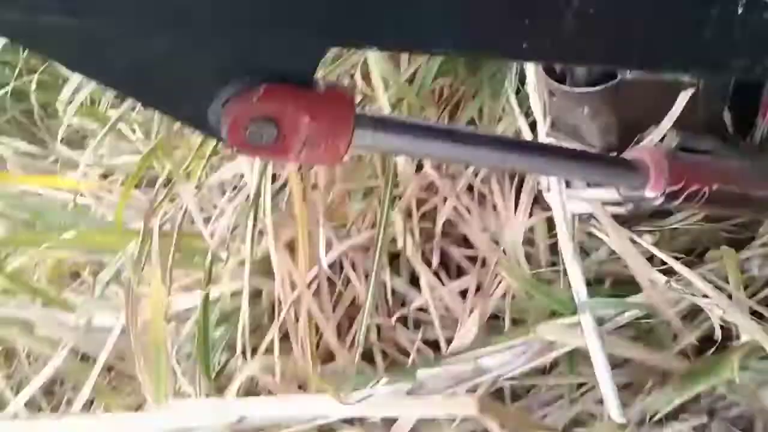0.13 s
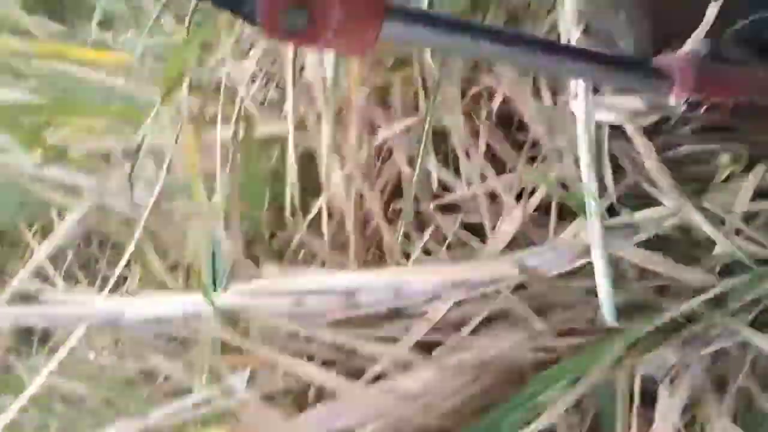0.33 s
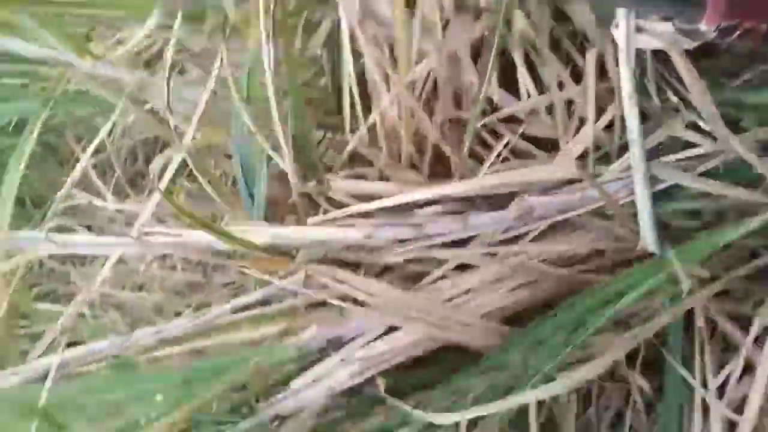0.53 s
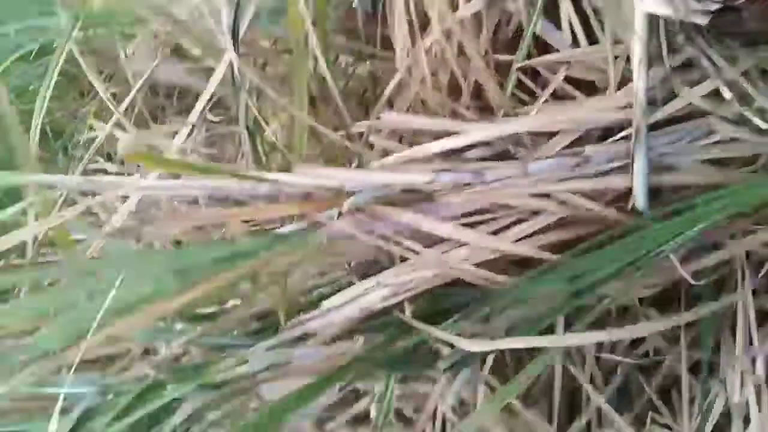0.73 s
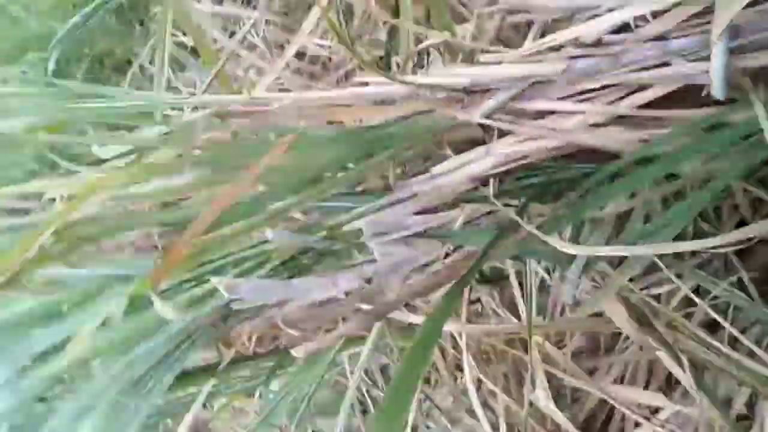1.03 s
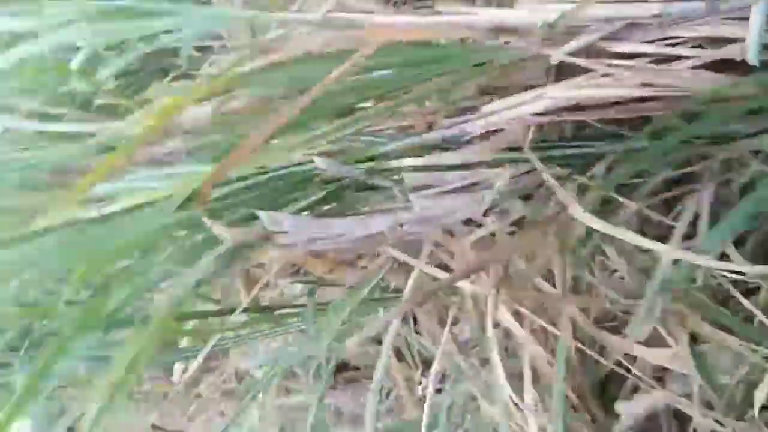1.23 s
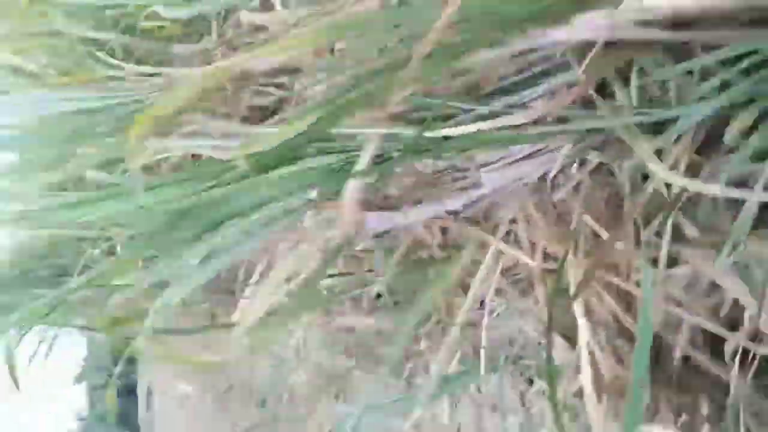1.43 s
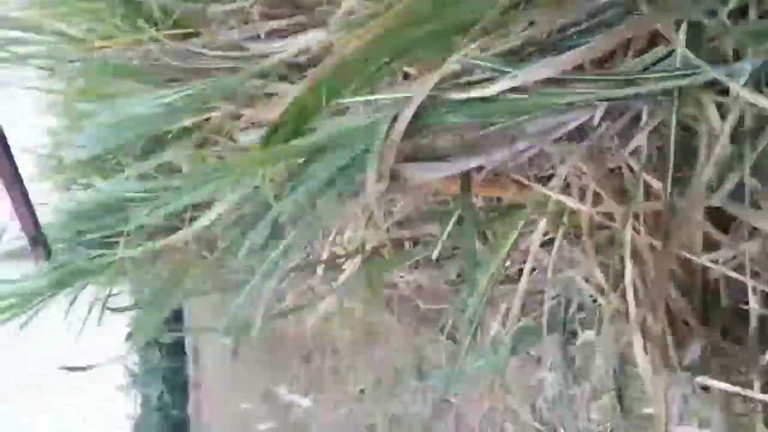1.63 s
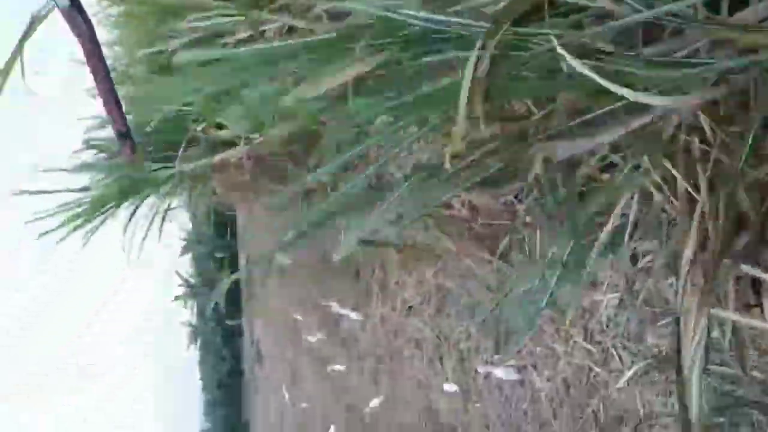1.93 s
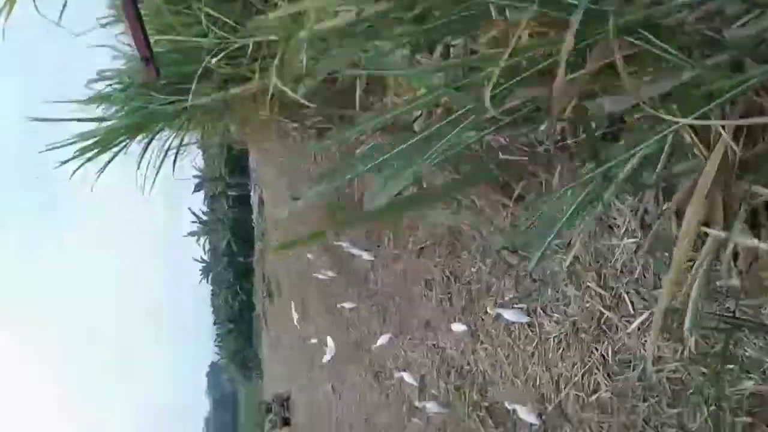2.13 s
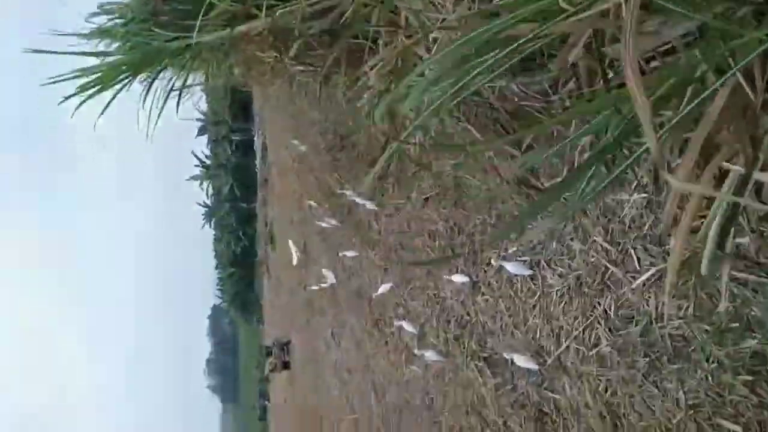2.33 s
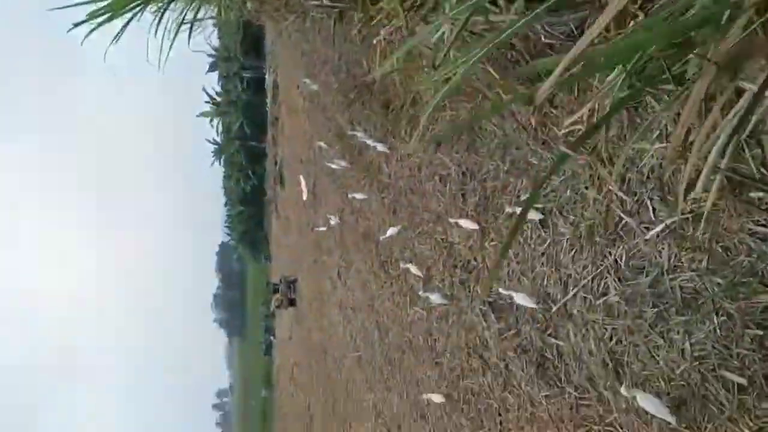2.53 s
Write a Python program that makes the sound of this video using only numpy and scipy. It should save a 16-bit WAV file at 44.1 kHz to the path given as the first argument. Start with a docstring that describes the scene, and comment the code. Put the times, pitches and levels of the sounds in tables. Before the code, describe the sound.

A sugarcane harvester works close by in a field, crushing stalks with crackles, hollow knocks and hissing leaves. Steel rattles over a wavering hydraulic drone and engine rumble. The crunching fades as the phone microphone turns away.

```python
"""Stalks crackle and steel rattles over a hydraulic drone: a cane harvester at work, close by.
Cane is crushed on its way through, stalks knock hollowly in the chute and leaves hiss, while small
impacts and hard blows sound the steel. A pump gives the drone; the engine rumbles low underneath.
The microphone is a phone's, and the crushing fades as it turns away towards the open field."""
import sys
import numpy as np
from scipy import signal
from scipy.fft import rfft, irfft
from scipy.io import wavfile
from scipy.ndimage import uniform_filter1d

SR = 44100
rng = np.random.default_rng(int(sys.argv[2]) if len(sys.argv) > 2 else 0)


def wav_record(signal):
    """Record a signal, one row per channel, as 16-bit PCM in the file named by sys.argv[1]."""
    frames = np.transpose(np.atleast_2d(signal))
    bounded = np.clip(frames, -1, 1)
    # unit amplitude maps onto the largest positive 16-bit level
    quanta = np.round(bounded * 32767).astype(np.int16)
    wavfile.write(sys.argv[1], SR, quanta)


N = 117747
T = np.arange(N) / SR

# cane passing through, relative levels: t/s, crushing/dB, frame/dB, high ring/dB, leaf hiss/dB
CANE_FEED = [(0.0, -20.5, -24, -29, -27), (0.01, -18.5, -30, -33, -28.5), (0.07, -20.5, -23, -37, -31),
             (0.1, -19, -29, -27, -34), (0.3, -22, -27.5, -45, -31.5), (0.39, -25.5, -32, -33, -33),
             (0.42, -19, -24.5, -26, -31), (0.52, -31.5, -34, -27.5, -33.5), (0.58, -28, -28, -26, -32),
             (0.59, -21, -34, -22, -29), (0.61, -21.5, -30, -34, -32.5), (0.68, -24, -28.5, -22, -32),
             (1.04, -25, -28.5, -37, -33.5), (1.11, -20.5, -41, -31, -32), (1.12, -27, -32.5, -26.5, -34),
             (1.34, -21.5, -27.5, -24, -31), (1.39, -25.5, -24, -36, -36), (1.4, -30.5, -39, -32, -34.5),
             (1.46, -26.5, -34, -28, -34.5), (1.52, -34.5, -41, -27, -37), (1.55, -27, -31, -23, -32.5),
             (1.64, -30, -36, -27.5, -36), (1.66, -35, -37, -36, -32), (1.67, -30, -25, -17.5, -38),
             (1.76, -34.5, -32.5, -24, -37), (1.89, -33, -36.5, -30, -37), (1.92, -50, -33, -31, -38),
             (2.01, -31, -37, -26, -33.5), (2.07, -40, -45, -35, -37), (2.1, -36, -30.5, -26, -34.5),
             (2.15, -33.5, -48, -32.5, -40), (2.18, -37, -33, -24, -39), (2.19, -43, -37, -34, -38.5),
             (2.36, -32.5, -40, -26, -36.5), (2.38, -38, -57, -36, -35), (2.48, -53, -34, -36, -39.5),
             (2.49, -35, -37, -23, -39), (2.52, -47, -43.5, -33.5, -38.5), (2.64, -40, -33, -27.5, -37.5),
             (2.67, -51, -40, -47, -40)]
# ring of the thin sheet parts, and the whistle: t/s, sheet level/dB, whistle level/dB
SHEET_AND_WHISTLE = [(0, -27, -47), (.5, -33, -56), (.9, -32.5, -56), (1.4, -35.5, -52), (1.55, -38.5, -43),
                     (1.75, -30.5, -50), (1.93, -49, -50), (2.05, -35.5, -48), (2.2, -37.5, -43),
                     (2.35, -34, -47), (2.5, -39.5, -48), (2.67, -34, -52)]


def gain_of(db):
    return 10 ** (np.asarray(db) / 20)


def unit_rms(x):
    return x / np.sqrt(np.mean(x ** 2) + 1e-20)


def curve(table, column):
    """One column of a timed table, joined by straight lines."""
    rows = np.array(table)
    return np.interp(T, rows[:, 0], rows[:, column])


def coloured(x, spectrum):
    """x shaped by a spectrum (f/Hz, level/dB), at rms 1."""
    f, db = np.transpose(spectrum)
    hz = np.fft.rfftfreq(len(x), 1 / SR)
    shape_db = np.interp(np.log(hz + 1), np.log(f + 1), db, left=-90)
    return unit_rms(irfft(rfft(x) * gain_of(shape_db), len(x)))


def wander(top_hz):
    """Random drift of rms 1, mostly slower than top_hz."""
    spectrum = rfft(rng.standard_normal(N)) / (1 + (np.fft.rfftfreq(N, 1 / SR) / top_hz) ** 2)
    spectrum[0] = 0
    return unit_rms(irfft(spectrum, N))


def resonate(x, hz, width):
    """x passed twice through one resonance, at rms 1."""
    carrier = np.exp(2j * np.pi * hz * np.arange(len(x)) / SR)
    pole = np.exp(-np.pi * width / SR)
    baseband = x / carrier
    for _ in range(2):
        baseband = signal.lfilter([1 - pole], [1, -pole], baseband)
    return unit_rms((carrier * baseband).real)


def resonant_noise(modes):
    """Noise in a set of resonances (f/Hz, width/Hz, level/dB), at rms 1."""
    bands = (gain_of(db) * resonate(rng.standard_normal(N), hz, width) for hz, width, db in modes)
    return unit_rms(sum(bands))


def strikes(events, rise_s):
    """An envelope with a quick rise and exponential fall for each (t/s, level/dB, t60/s)."""
    out = np.zeros(N)
    for start, db, t60 in events:
        age = np.maximum(T - start, 0)
        out += np.minimum(age / rise_s, 1) * gain_of(db - 60 * age / t60)
    return out


def rattle(modes, patchy_db, hits_per_s=2500, spread_db=3.0):
    """Dense small impacts ring each steel part, which comes and goes by itself."""
    out = np.zeros(N)
    for hz, width, db in modes:
        hits = (rng.random(N) < hits_per_s / SR) * rng.choice([-1., 1.], N)
        force_db = spread_db * np.minimum(rng.exponential(1, N), 5) + patchy_db * wander(10)
        out += gain_of(db) * resonate(hits * gain_of(force_db), hz, width)
    return unit_rms(out)


def crushing_cane(crackle_db=1.5, patch_db=5.0):
    """Close crackling noise whose colour shifts in patches as stalks break."""
    # spectrum of crushed stalks: f/Hz, level/dB
    spectrum = [(1400, -23), (1730, -13.5), (2360, -23), (3070, -5.5), (3550, -9), (3850, -4.5),
                (4120, -10.5), (4450, -1.5), (5100, -7.5), (5450, -11.5), (5700, -4), (5920, -11),
                (6300, -2), (6700, -5), (6900, -7), (7400, -4), (9000, -10), (11000, -56)]
    crackle = rng.standard_normal(N) * gain_of(crackle_db * wander(170))
    frames = signal.stft(coloured(crackle, spectrum), nperseg=512, noverlap=384)[2]
    patches = rng.standard_normal(frames.shape)
    for size, axis in [(2, 0), (30, 1), (10, 1)]:  # smooth across frequency, then twice along time
        patches = uniform_filter1d(patches, size, axis)
    frames *= gain_of(patch_db * unit_rms(patches))
    crunch = signal.istft(frames, nperseg=512, noverlap=384)[1][:N]
    return gain_of(curve(CANE_FEED, column=1) - 1) * unit_rms(crunch)


def rattling_steel():
    """The frame and thin sheet parts rattle, with a high ring above them."""
    # resonances of the frame, the sheet parts and the high ring: f/Hz, width/Hz, level/dB
    frame_modes = [(2567, 54, -2), (2940, 110, 5), (3116, 153, 6.5)]
    sheet_modes = [(3474, 130, -7), (3820, 51, -5), (4140, 37, 0.5), (4470, 59, 2.5), (4975, 86, -0.5),
                   (5770, 48, 3.5), (6020, 31, -10), (6420, 120, 3.5), (6840, 110, -1)]
    high_modes = [(7280, 110, -8), (7570, 200, 0), (7830, 130, -3), (8330, 120, -8), (9230, 130, -5)]
    frame = gain_of(curve(CANE_FEED, column=2) - 1.5) * rattle(frame_modes, patchy_db=3.5)
    sheet = gain_of(curve(SHEET_AND_WHISTLE, column=1)) * rattle(sheet_modes, patchy_db=5.0)
    high_ring = gain_of(curve(CANE_FEED, column=3) - 5) * rattle(high_modes, patchy_db=1.5)
    return frame + sheet + high_ring


def hydraulic_drone(waver_hz=1.72, waver_db=2):
    """The pump's tone wavers in pitch and level inside a band of roar."""
    # course of the pump, relative levels: t/s, f/Hz, tone/dB, roar/dB
    pump = [(0.0, 353, -30.5, -31.5), (0.07, 351, -28, -33), (0.37, 344.6, -21, -32),
            (0.46, 341.9, -31.5, -37), (0.47, 345, -21, -33), (0.98, 341.5, -27, -30),
            (1.02, 340.2, -29, -40), (1.07, 349.6, -23.5, -31), (1.11, 342.3, -44, -42),
            (1.13, 342.3, -22.5, -30), (1.22, 342.6, -55, -51.5), (1.28, 340.2, -26, -30.5),
            (1.37, 340, -41, -53), (1.39, 348.2, -27, -29), (1.54, 343.7, -21.5, -31),
            (1.62, 354.5, -43, -33), (1.66, 351.2, -26, -32.5), (1.79, 343.9, -37.5, -34.5),
            (1.87, 350, -22, -29.5), (2.09, 345.5, -27.5, -39), (2.24, 334.9, -29, -32),
            (2.36, 337, -42, -56), (2.45, 347.0, -36, -49), (2.54, 337.2, -23, -30),
            (2.59, 338.4, -34, -46), (2.67, 347, -24, -33)]
    # resonances around the tone: f/Hz, width/Hz, level/dB
    roar_modes = [(377.4, 74, 1.5), (438.6, 29, -11.5), (321.4, 21.6, -1.5)]
    hz = curve(pump, column=1) + waver_hz * wander(13.3)
    tone = np.sqrt(2) * np.sin(2 * np.pi * np.cumsum(hz) / SR)
    tone *= gain_of(curve(pump, column=2) + waver_db * wander(25.4))
    roar = gain_of(curve(pump, column=3) + 3) * resonant_noise(roar_modes)
    return tone + roar


def stalk_knocks(rise_s=0.0045, roughness=0.48):
    """Each stalk knocks in the chute and rings at its own pitch, roughened by scraping."""
    # stalks striking the chute: t/s, level/dB, f/Hz, t60/s
    knocks = [(.003, -24, 1333, 0.079), (0.031, -19, 1743, 0.19), (0.056, -27, 1740, .15),
              (.1, -25, 1770, 0.095), (.205, -29, 2170, .15), (0.263, -22, 1717, 0.29),
              (0.265, -27, 1980, .17), (.37, -21, 629, 0.19), (.44, -34, 1680, .15),
              (0.589, -14.5, 1904, 0.081), (.65, -29, 1620, .15), (0.699, -30.5, 1940, 0.22),
              (0.736, -26, 1327, 0.33), (.778, -28, 1263, 0.22), (.778, -27.5, 1770, 0.2),
              (.858, -20.5, 641, 0.36), (.88, -28, 1640, 0.14), (.957, -19.5, 685, 0.16),
              (0.982, -30, 660, .13), (1.008, -18.5, 1640, 0.097), (1.012, -25, 2170, .15),
              (1.064, -10.5, 645, 0.15), (1.09, -15.5, 608, 0.12), (1.19, -30, 1944, 0.28),
              (1.237, -22, 661, 0.13), (1.309, -19, 1592, 0.21), (1.32, -27, 1965, 0.17),
              (1.407, -24, 1240, 0.076), (1.568, -28.5, 1223, 0.23), (1.797, -29, 1660, 0.22),
              (1.806, -29.5, 1190, 0.16), (1.907, -18, 990, 0.22), (1.905, -33, 1180, 0.26),
              (1.909, -27, 805, .1), (1.91, -23.5, 1648, 0.18), (1.946, -15, 957, 0.11),
              (1.988, -30.5, 1740, 0.41), (2.0, -18, 1300, 0.13), (2.02, -28, 1012, 0.15),
              (2.06, -33.5, 1108, 0.34), (2.109, -33, 1480, 0.2), (2.139, -24.5, 1084, 0.22),
              (2.276, -27, 1544, 0.22), (2.291, -23, 847, 0.15), (2.298, -17, 1037, 0.11),
              (2.345, -16, 882, 0.089), (2.403, -21, 1012, 0.2), (2.519, -36, 1797, 0.25),
              (2.65, -25, 997, 0.15)]
    length = 8000
    t = np.arange(length) / SR
    out = np.zeros(N + length)
    for start, db, hz, t60 in knocks:
        scrape = resonate(rng.standard_normal(length), hz, width=113)
        ring = (1 - roughness) * np.sin(2 * np.pi * hz * t) + roughness * scrape
        at = round(start * SR)
        out[at:at + length] += ring * (1 - np.exp(-t / rise_s)) * gain_of(db - 60 * t / t60)
    return out[:N]


def steel_blows(split_hz=3540):
    """Hard blows on the steel: each a crack, duller or brighter, that dies away."""
    # blows: t/s, level below the split/dB, level above it/dB, t60/s
    blows = [(.056, -19, -31, 0.14), (0.59, -18, -40, 0.088), (1.376, -35, -48, 0.088),
             (1.6728, -37, -15.5, 0.12), (1.705, -44, -23.5, 0.12), (1.907, -36, -33, 0.067),
             (2.103, -38, -27, 0.074), (2.6, -30, -34, .15)]
    # spectrum of the crack: f/Hz, level/dB
    spectrum = [(880, -39), (1500, -20), (2250, -54), (2450, -17.5), (3090, -0.5), (3780, -6.5), (4590, -5),
                (15000, -24.5)]
    crack = coloured(rng.standard_normal(N), spectrum)
    low = signal.sosfiltfilt(signal.butter(4, split_hz, fs=SR, output="sos"), crack)
    rows = np.array(blows)
    dull = unit_rms(low) * strikes(rows[:, [0, 1, 3]], rise_s=0.00032)
    bright = unit_rms(crack - low) * strikes(rows[:, [0, 2, 3]], rise_s=0.0007)
    return dull + bright


def leaves(flicker_db=1.5):
    """Leaves pass through with a wide, flickering hiss, and one snaps."""
    # spectrum of the hiss: f/Hz, level/dB
    spectrum = [(3000, -50), (7200, -14), (8100, -3.5), (8700, -4), (9300, -3.5), (10000, -1.5),
                (13000, -9), (15400, -8)]
    # dry snap of a leaf: t/s, level/dB, t60/s
    snaps = [(1.953, -17, .035)]
    hiss = coloured(rng.standard_normal(N) * gain_of(flicker_db * wander(47)), spectrum)
    snap = coloured(rng.standard_normal(N), [(7320, 0), (16000, 0)]) * strikes(snaps, rise_s=0.003)
    return gain_of(curve(CANE_FEED, column=4) + 3.5) * hiss + snap


def engine():
    """The engine rumbles and growls underneath, in a nearly steady wash of machine noise."""
    # course of the engine: t/s, rumble/dB, growl/dB
    levels = [(0.0, -36, -57), (0.09, -49, -29.5), (0.13, -25.5, -40), (0.38, -43, -40), (0.41, -27.5, -39),
              (0.6, -53, -45), (0.64, -34, -42), (0.76, -62, -41), (0.79, -43, -37), (0.85, -53, -27),
              (0.94, -28.5, -51), (0.98, -36.5, -42), (1.2, -31, -40), (1.35, -68, -48), (1.37, -55, -21.5),
              (1.43, -34, -35), (1.58, -51, -41), (1.61, -26, -24), (1.71, -51, -45), (1.78, -27.5, -33.5),
              (1.99, -34.5, -29), (2.01, -26, -41), (2.05, -26, -28.5), (2.17, -23.5, -33),
              (2.19, -31, -25), (2.42, -29, -26.5), (2.45, -20.5, -36), (2.56, -35, -23.5),
              (2.62, -24.5, -33.5), (2.67, -41, -21)]
    # resonances of the rumble and the growl: f/Hz, width/Hz, level/dB
    rumble_modes = [(83, 14, -7.5), (112.7, 40, 1)]
    growl_modes = [(210.3, 143, -2.5), (267.7, 70, 0.5)]
    # spectrum of the machine wash: f/Hz, level/dB
    spectrum = [(12, -63), (20, -48), (103, -10.5), (188, -14), (226, -34), (345, -4.5), (374, -4),
                (449, -27.5), (561, -22), (1570, -29), (2170, -36), (2350, -43), (2500, -23), (3250, -37),
                (5500, -120)]
    wash = gain_of(-33 + 1.5 * wander(8)) * coloured(rng.standard_normal(N), spectrum)
    rumble = gain_of(curve(levels, column=1)) * resonant_noise(rumble_modes)
    growl = gain_of(curve(levels, column=2)) * resonant_noise(growl_modes)
    return rumble + growl + wash


def whistle():
    """A faint, thin whistle of narrow-band noise that comes and goes."""
    level_db = curve(SHEET_AND_WHISTLE, column=2) + 2.5 * wander(6)
    return gain_of(level_db) * resonate(rng.standard_normal(N), hz=11056, width=25)


def scene():
    """The harvester from close by in the field, in mono."""
    foreground = crushing_cane() + rattling_steel() + hydraulic_drone() + stalk_knocks() + steel_blows()
    return (foreground + leaves() + engine() + whistle())[None]


def record(dry, low_hz=44.3, top_hz=15500):
    """The phone's microphone rolls off the deep bass and cuts the highest treble."""
    thinned = signal.sosfilt(signal.butter(1, low_hz, "high", fs=SR, output="sos"), dry)
    band_limit = signal.firwin(1501, top_hz, window=("kaiser", 9), fs=SR)
    return signal.oaconvolve(thinned, band_limit[None], "same")


dry = scene()
out = record(dry)
wav_record(out)
```